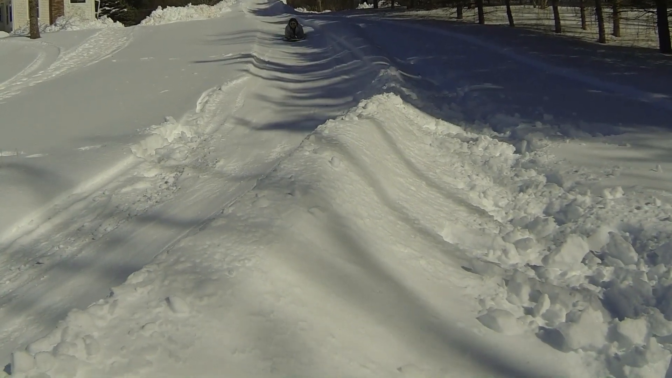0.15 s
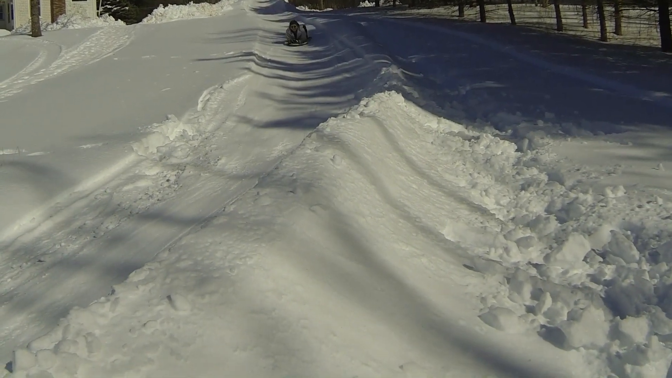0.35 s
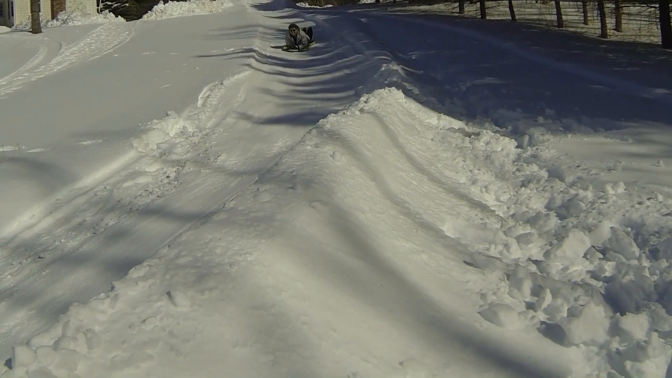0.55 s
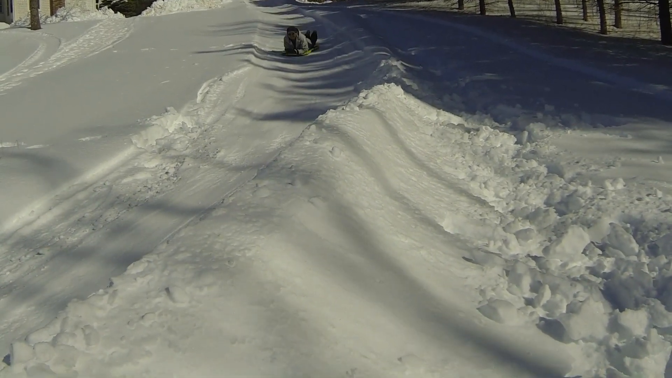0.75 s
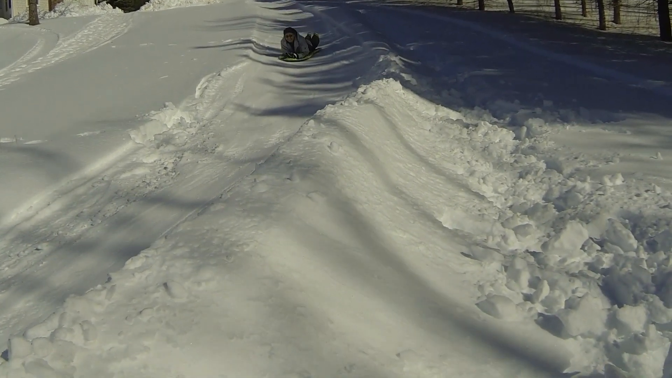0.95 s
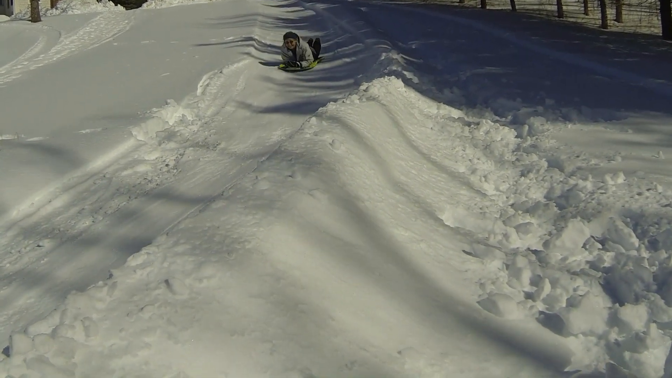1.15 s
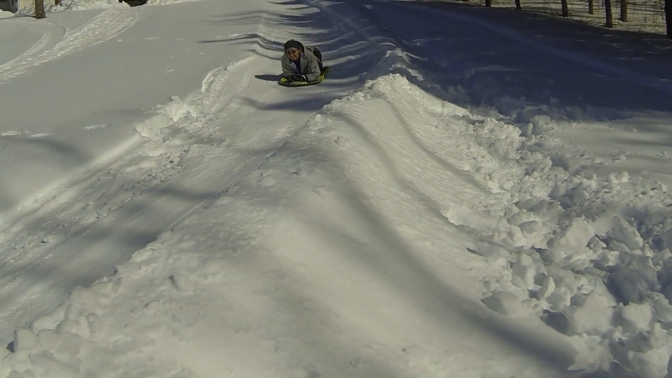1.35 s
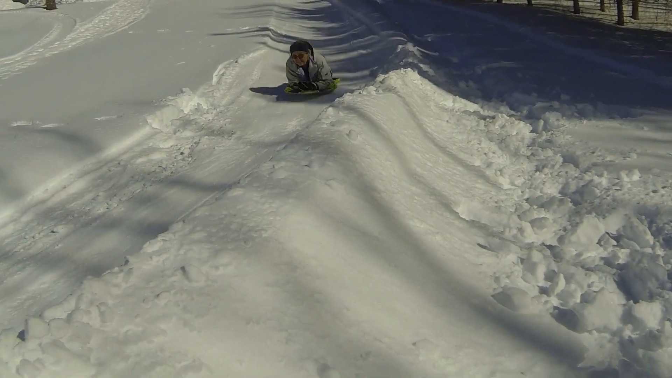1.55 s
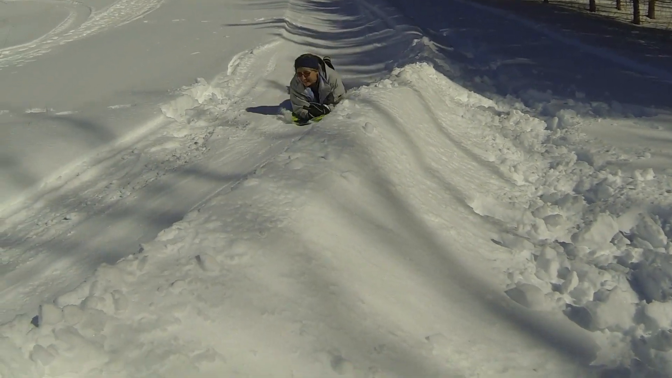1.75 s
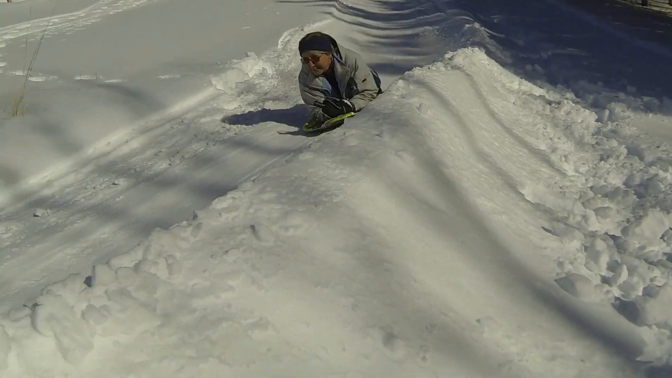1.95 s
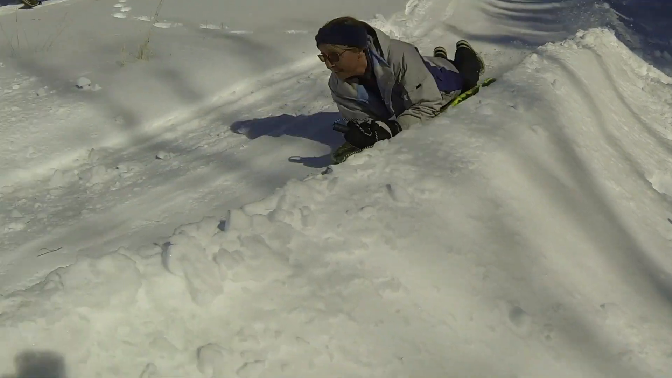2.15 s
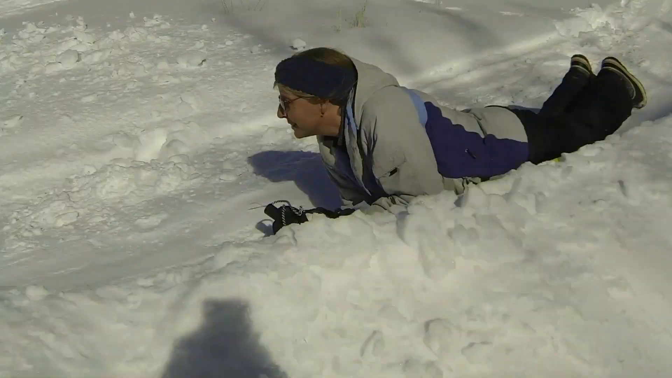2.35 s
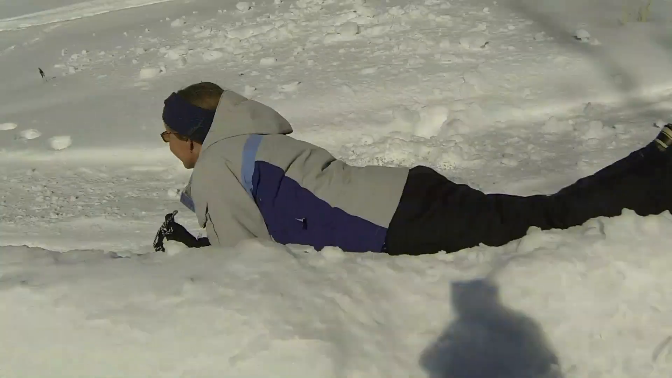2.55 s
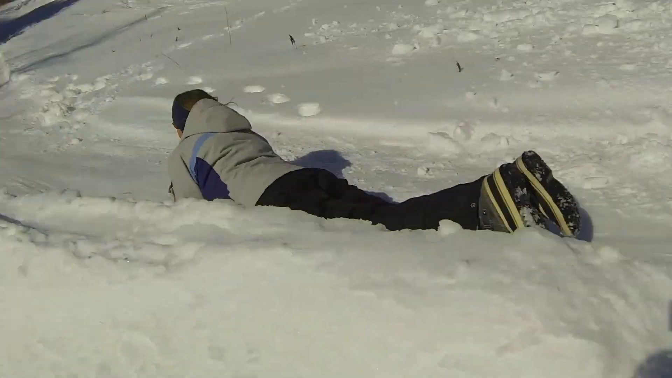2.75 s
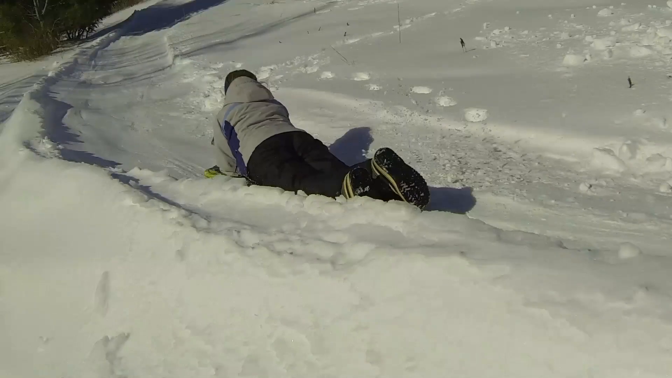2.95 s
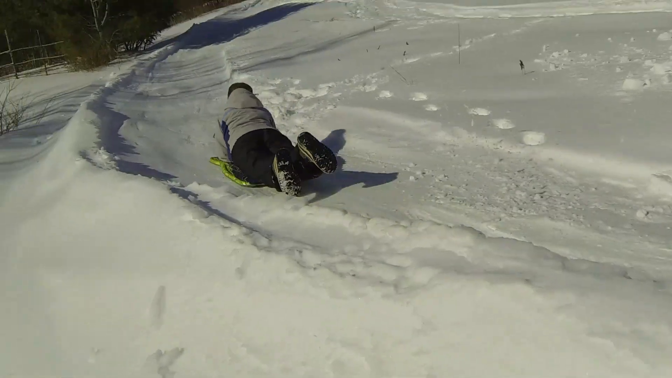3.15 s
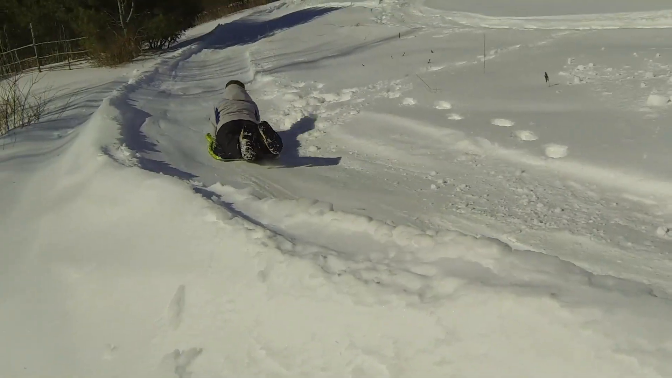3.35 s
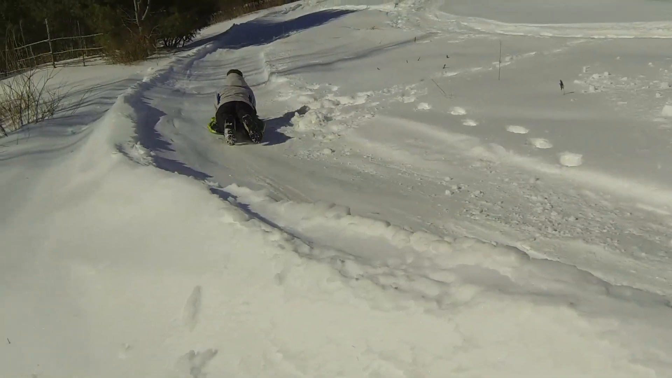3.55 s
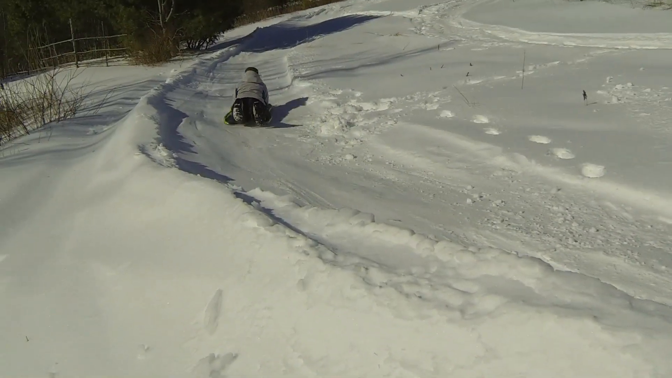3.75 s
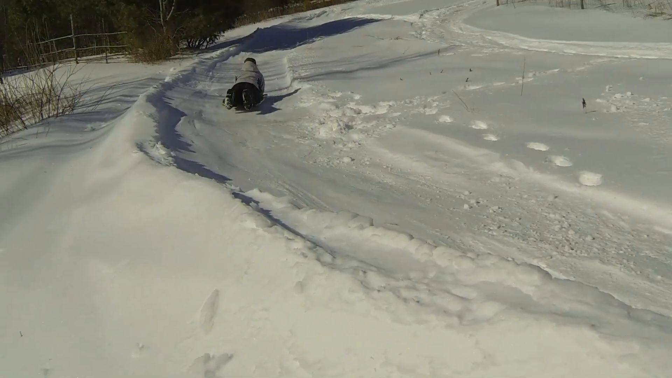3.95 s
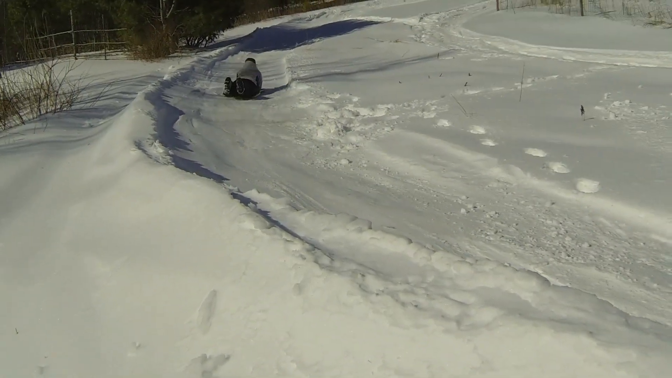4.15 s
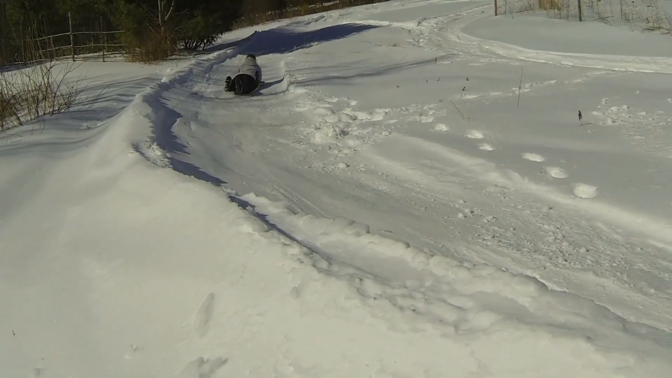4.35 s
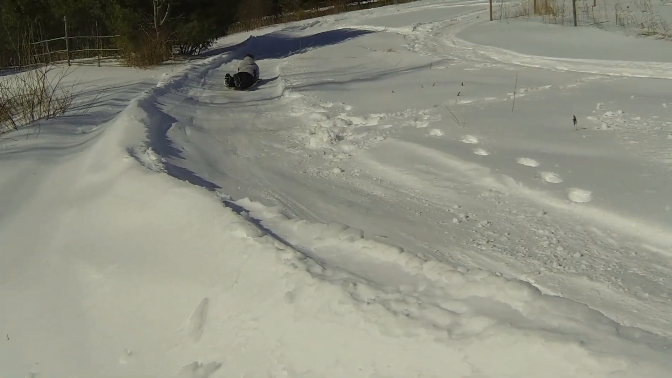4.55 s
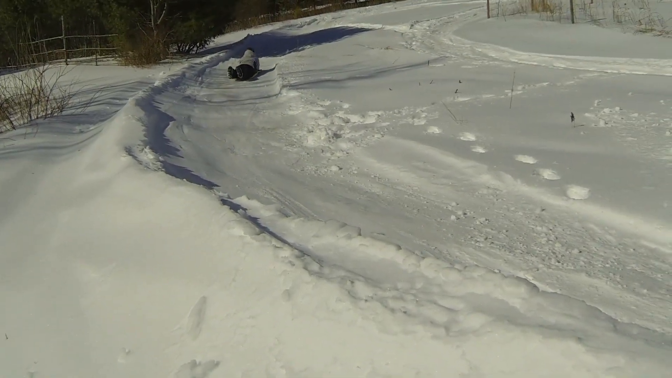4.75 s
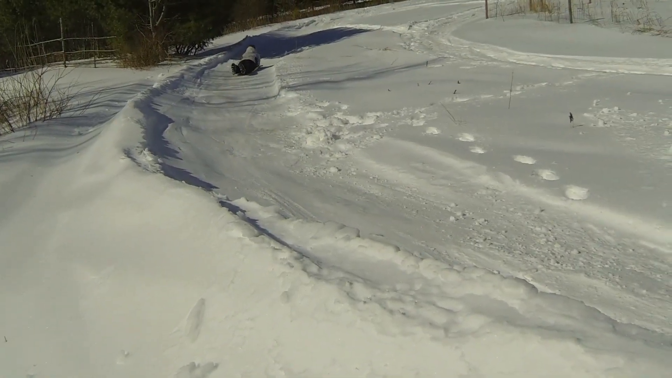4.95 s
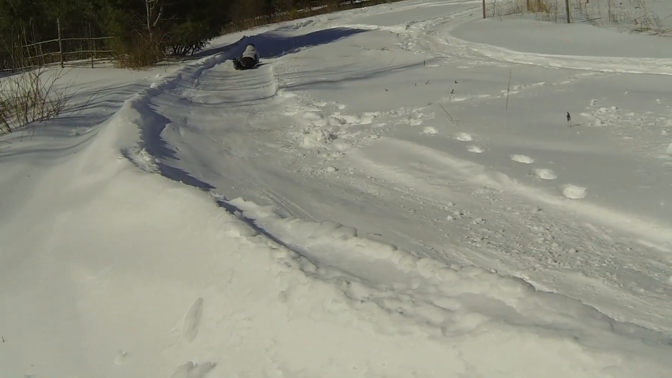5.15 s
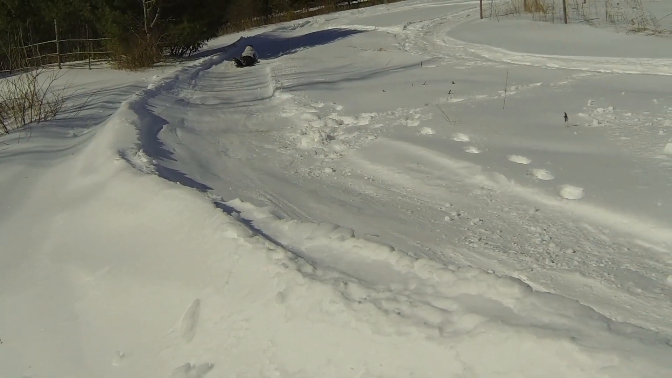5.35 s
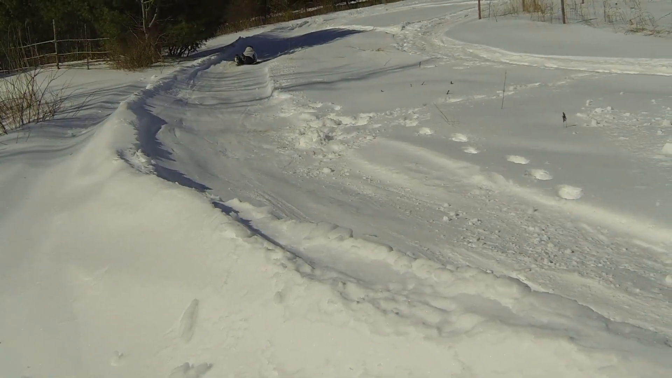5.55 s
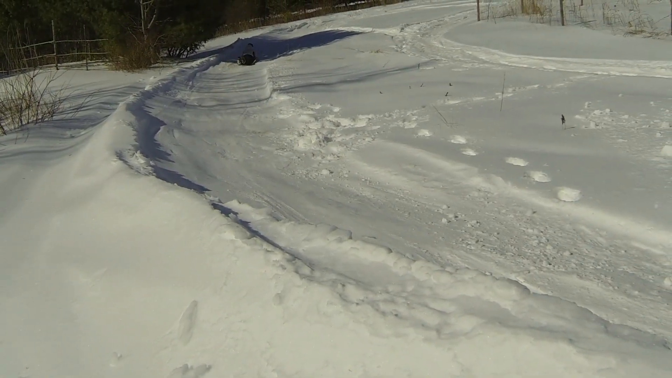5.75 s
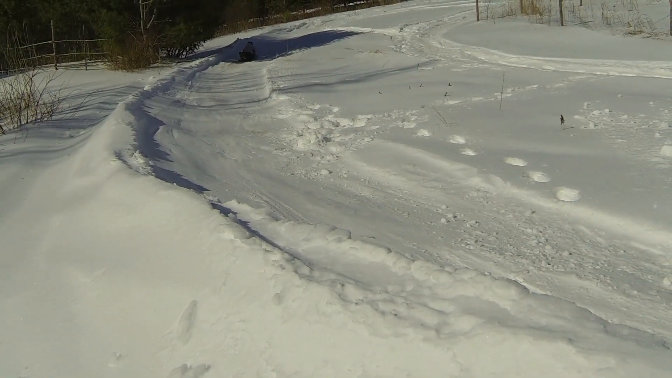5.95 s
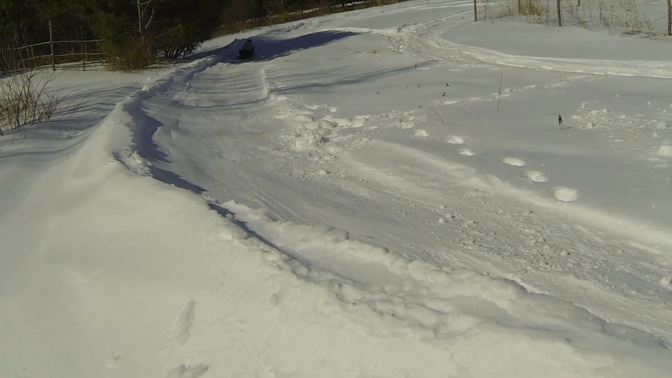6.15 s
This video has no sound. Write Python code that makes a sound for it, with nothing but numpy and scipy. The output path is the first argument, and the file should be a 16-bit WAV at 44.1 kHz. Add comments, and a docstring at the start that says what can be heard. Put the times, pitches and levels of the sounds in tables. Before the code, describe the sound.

An open snow slope, dry and echoless, heard through a small camera microphone with steady soft air and a very faint, high electronic whirr. From 0 to 1 s, low gusts and bumps of wind dominate, strongest near 0.8 s, while a distant plastic sled rumbles faintly with a fine hiss. Between 1 and 2.2 s it nears: hollow drumming swells, wind gusts again, and dull thumps, crust snaps and bright edge slices cluster around 1.75 to 2 s. The close pass peaks from 2.4 to 2.8 s, with heavy muffled knocks, crunching, cracking and spraying powder, densest near 2.65 s. From 2.8 to 4.1 s the tail scrapes grittily away, with knocks and snaps near 3.4, 3.6 and 4 s. Afterwards the slide thins and slows; light scrapes and wind bumps remain, and a faint hollow drone rises from about 4.9 s and holds to the end at 6.2 s.

```python
"""Sled passing on packed snow

A rider on a plastic sled comes down a packed run, sweeps past close by and glides away.
Hull rumble, crunch, scrape, hiss and powder are coloured grain noise; thumps are decaying sines.
Snaps are short noise bursts, edge slices swelling bright noise. Wind noise and low knocks buffet the
microphone of a small camera, whose electronics whirr faintly; steady air and a late hollow drone lie under.
"""
import sys
import numpy as np
from scipy import signal
from scipy.fft import rfft, irfft, next_fast_len
from scipy.io import wavfile

SR = 44100
rng = np.random.default_rng(int(sys.argv[2]) if len(sys.argv) > 2 else 0)


def output_pcm(signal):
    """Save a mono or channel-first signal as 16-bit PCM at the path in sys.argv[1].

    Samples are clipped to [-1, 1] before scaling.
    """
    pcm = np.clip(np.atleast_2d(signal).T, -1, 1) * 32767
    wavfile.write(sys.argv[1], SR, np.round(pcm).astype(np.int16))


N = 274037
TIME_S = np.arange(N) / SR

# Snow grip on the base, powdery patches; before trims: t/s, hiss level/dB, spray level/dB
GLIDE = [(0, -60.5, -70), (0.38, -59, -67), (0.72, -59.5, -60), (1.1, -58, -63), (1.38, -54.5, -60),
         (1.7, -66, -69.5), (1.88, -57, -63.5), (2.16, -61, -63.5), (2.36, -52, -58), (2.72, -51.5, -57.5),
         (2.92, -57.5, -60.5), (3.4, -54.5, -62.5), (3.68, -57, -67), (3.84, -53.5, -63), (4.05, -56, -67),
         (4.52, -55.5, -70.5), (5.35, -63.5, -75), (5.8, -64.5, -70), (6.21, -67.5, -72.5)]
# Breeze on the microphone, before trim: t/s, level/dB
GUSTS = [(0.0, -63), (0.03, -53.5), (0.48, -44.5), (0.62, -41.5), (0.8, -36.5), (1.12, -47.5),
         (1.38, -36.5), (2.18, -40), (2.28, -30), (2.34, -44), (2.5, -44), (2.61, -34.5), (3.16, -43),
         (4.44, -41.5), (4.55, -37), (4.58, -51), (4.74, -46), (5.71, -53), (6.16, -46.5), (6.21, -59)]
# Eddies striking the microphone: t/s, envelope peak/dB, f/Hz, t60/s
BUFFETS = [(0.150, -34.5, 88, 0.025), (0.452, -33.5, 90, 0.02), (0.799, -23, 89, 0.02),
           (1.992, -25, 65, 0.046), (2.622, -24, 74.5, 0.059), (2.775, -26, 62, 0.028),
           (3.684, -32, 99, 0.043), (3.828, -33, 135, 0.05), (4.038, -27.5, 83.6, 0.02),
           (4.099, -24.5, 79.5, 0.0098), (4.505, -33, 65, 0.045), (4.768, -35, 65, 0.047),
           (5.565, -35, 68, 0.053)]
# Hull hitting lumps, before the shell's low-pass: t/s, envelope peak/dB, f/Hz, t60/s
THUMPS = [(0.934, -27.5, 147, 0.049), (1.515, -34, 214, 0.092), (1.557, -32, 200, 0.06),
          (1.595, -32, 147, 0.069), (1.7385, -19, 302, 0.015), (1.822, -24.5, 250, 0.016),
          (1.940, -28, 256, 0.085), (1.956, -28, 298, 0.04), (1.974, -31, 386, 0.015),
          (2.008, -28, 332, 0.023), (2.028, -32, 426, 0.037), (2.239, -28, 427, 0.012),
          (2.262, -33, 235, 0.05), (2.4085, -19.5, 260, 0.063), (2.461, -26.5, 359, 0.05),
          (2.5095, -16, 228, 0.0091), (2.622, -19, 310, 0.02), (2.629, -16, 170, 0.0087),
          (2.6395, -11.5, 480, 0.0098), (2.644, -26.5, 610, 0.056), (2.657, -26, 795, 0.036),
          (2.667, -23, 324, 0.018), (2.678, -27, 576, 0.017), (2.689, -26, 286, 0.044),
          (2.7035, -24, 232, 0.026), (2.767, -17, 192, 0.025), (2.780, -20, 209, 0.04),
          (3.3135, -24, 233, 0.022), (3.4345, -23, 201, 0.016), (3.574, -23, 235, 0.012),
          (3.599, -33, 330, 0.032), (4.0155, -26.5, 310, 0.021)]
# Crust snapping, before trim: t/s, level/dB, f/Hz, bandwidth/Hz, t60/s
SNAPS = [(0.995, -41.5, 3400, 1500, 0.034), (1.594, -45, 2930, 1200, 0.03), (1.798, -35, 3060, 900, 0.03),
         (1.81, -36, 2570, 2600, 0.02), (1.899, -39, 2960, 950, 0.035), (1.939, -35.5, 2300, 1700, 0.047),
         (2.013, -45, 2200, 1900, 0.03), (2.090, -41.5, 3600, 1400, 0.014), (2.316, -35, 1500, 1000, 0.026),
         (2.480, -31, 3070, 800, 0.035), (2.577, -32.5, 1700, 950, 0.025), (2.624, -32, 2960, 2400, 0.04),
         (2.766, -34, 1900, 1800, 0.012), (2.781, -37.5, 3800, 3000, 0.032),
         (2.929, -30.5, 1510, 650, 0.015), (3.069, -38, 2850, 450, 0.06),
         (3.413, -29.5, 1490, 1400, 0.0074), (3.465, -32.5, 1500, 800, 0.01),
         (3.569, -36, 2380, 1800, 0.016), (3.823, -35, 2800, 900, 0.008), (3.982, -29, 755, 400, 0.022),
         (4.309, -40.5, 3620, 400, 0.027)]
# Hull edge slicing off snow, before trim: t/s, length/s, level/dB, peak f/Hz, peak-to-shower ratio/1
SLICES = [(1.283, 0.25, -65.5, 10500, 1.2), (1.736, 0.019, -61, 3300, 1.7),
          (1.739, 0.116, -52.5, 3470, 0.55), (1.795, 0.074, -64, 10000, 1.0),
          (2.21, 0.16, -62.5, 10000, 0.64), (2.456, 0.053, -59, 6000, 0.8), (2.56, 0.12, -54.5, 6000, 1.0),
          (2.752, 0.031, -58, 5700, 1.1), (2.772, 0.085, -50.5, 3400, 3.3), (3.02, 0.16, -62, 3050, 5),
          (2.93, 0.22, -68, 10000, 0.61), (3.143, 0.046, -60, 6000, 0.45), (3.56, 0.054, -59, 5800, 0.89),
          (3.9, 0.05, -66, 6000, 0.5)]
# Rises press the hull down, dips unload it: middle t/s, length/s, rumble gain/dB, friction gain/dB
RISES = [(0.24, 0.25, 5, -2), (0.9, 0.36, 4, 1.5), (1.31, 0.24, 6, 1), (1.54, 0.34, 2, 3),
         (1.67, 0.068, 3.5, 2), (1.745, 0.056, 5.5, 7.5), (1.82, 0.076, 5.5, 7), (1.98, 0.17, 7, 1.5),
         (2.02, 0.028, -0.5, 4), (2.15, 0.08, -1.5, 1), (2.24, 0.071, 4.5, 3), (2.48, 0.16, 1.5, 3.5),
         (2.36, 0.1, -1, 0), (2.54, 0.1, -1.5, -4.5), (2.605, 0.093, 3.5, 3), (2.67, 0.096, 3.5, 3),
         (2.735, 0.069, -4, -2.5), (2.79, 0.18, 4, 1), (2.9, 0.29, -3.5, -1), (3.07, 0.26, -2, 2.5),
         (3.235, 0.17, -5, -0.5), (3.39, 0.2, -3, -1), (3.48, 0.078, 3.5, 3), (3.59, 0.12, 2.5, 0.5),
         (3.66, 0.061, 1.5, -1.5), (3.9, 0.13, 3, 1.8), (3.99, 0.096, -2.5, -1), (4.32, 0.25, -1.5, 0),
         (4.64, 0.11, 0, -1.5), (5.02, 0.062, 0.5, -3.5), (5.2, 0.36, -3.5, 1)]
# Rear edge digging in: middle t/s, length/s, scrape gain/dB
DRAGS = [(2.88, 0.44, 10.5), (3.04, 0.07, 3), (3.475, 0.06, 4), (3.6, 0.22, 7), (3.905, 0.12, 5.5),
         (4.835, 0.06, 3), (4.97, 0.092, 4.5), (5.99, 0.3, 6.5)]

# Relative spectra of hull, crust, rear edge, base, powder, thrown snow: f/Hz, level/dB per Hz
RUMBLE_COLOUR = [(50, -30), (125, -4), (170, -1.5), (270, 3.5), (450, 1.5), (600, -2), (740, -6),
                 (860, -13.5), (960, -20.5), (1200, -27), (2500, -45)]
CRUNCH_COLOUR = [(500, 6), (900, 7), (1150, 1), (1350, -2), (1600, 3.5), (2050, -3.5), (2600, -9),
                 (4000, -35)]
GRIT_COLOUR = [(300, -7), (550, 3.5), (850, -1), (1100, -4.5), (1400, -9.5), (2000, -17)]
HISS_COLOUR = [(1200, -40), (2000, -10), (2500, -2.5), (3000, 2), (3500, -4), (4000, -9), (4800, -21.5),
               (7000, -40.5)]
SPRAY_COLOUR = [(3000, -1), (4200, -2.5), (4900, -4), (5600, 3), (6200, 0), (7000, -5), (8200, -9),
                (9300, -11.5), (10500, -12.5), (12000, -19), (13500, -28), (15200, -39)]
SHOWER_COLOUR = [(2500, 1), (3500, 3.5), (4800, -1.5), (6000, -0.5), (8000, -7.5), (11000, -13.5),
                 (13000, -19), (15000, -28)]
# Relative spectra of wind, steady air, electronics, far drone: f/Hz, level/dB per Hz
WIND_COLOUR = [(10, -29), (25, 6), (36, 2), (60, 0), (100, -3.5), (150, -8.5), (210, -15), (500, -27.5)]
AIR_COLOUR = [(30, 8.5), (130, -1), (210, -2.5), (340, -9), (700, -12.5), (1300, -15), (3000, -28.5),
              (5000, -32.5), (8000, -31), (15000, -50)]
WHIRR_COLOUR = [(6000, -42), (7600, -7), (8300, -5), (9000, -13), (11000, -32)]
DRONE_COLOUR = [(140, -22), (180, 1), (215, 2), (265, -1.5), (330, -25)]

PASS_S, SPEED_M_PER_S, CLOSEST_M = 2.563, 5.73, 3.02
RUMBLE_DB = -36  # at the closest point, before load, aspect and judder
RUNOUT_S, RUNOUT_LENGTH_S, RUNOUT_LOSS_DB = 4.73, 0.6, 5.5  # hull quietens as the sled slows on the level
SHELL_CUTOFF_HZ = 890  # padded shell dulls knocks above this
AIR_DB, WHIRR_DB = -53.5, -79
FRAME_HZ, FRAME_START_S = 29.97, 0.0268
CUTOFF_HZ = 15300


def from_db(db):
    """Decibels to amplitude gain."""
    return 10 ** (np.asarray(db) / 20)


def rms_one(x):
    """Scale to unit rms."""
    return x / np.sqrt(np.mean(x ** 2) + 1e-20)


def in_time(rows):
    """Interpolate each column of a time table to every sample."""
    t_s, *columns = np.transpose(rows)
    return [np.interp(TIME_S, t_s, column) for column in columns]


def coloured(x, spectrum):
    """Shape x by a spectrum falling 12 dB per octave past both ends; rms 1."""
    hz, db = np.transpose(spectrum)
    size = next_fast_len(N)
    f_hz = np.maximum(np.fft.rfftfreq(size, 1 / SR), 1)
    ends = np.minimum(f_hz / hz[0], 1) ** 2 * np.minimum(hz[-1] / f_hz, 1) ** 2
    gain = from_db(np.interp(np.log(f_hz), np.log(hz), db))
    return rms_one(irfft(rfft(x, size) * ends * gain, size)[:N])


def drift(rate_hz):
    """Smooth random curve, rms 1: noise whose amplitude spectrum is halved at rate_hz."""
    size = next_fast_len(N)
    f_hz = np.fft.rfftfreq(size, 1 / SR)
    smooth = rfft(rng.standard_normal(N), size) / (1 + (f_hz / rate_hz) ** 2)
    return rms_one(irfft(smooth, size)[:N])


def grains(per_s, spread_db, share):
    """Snow grains giving way: uneven clicks, share of the power, in smooth friction noise."""
    size_db = spread_db * np.minimum(rng.exponential(1, N), 4)
    sizes = from_db(size_db) * rng.choice([-1, 1], N)
    clicks = rms_one(sizes * (rng.random(N) < per_s / SR))
    return np.sqrt(share) * clicks + np.sqrt(1 - share) * rng.standard_normal(N)


def blow(start_s, t60_s, rise_s):
    """Time since a contact, and its swelling and dying envelope of height 1."""
    age_s = np.clip(TIME_S - start_s, 0, 1)
    shape = (1 - np.exp(-age_s / rise_s)) ** 2 * from_db(-60 * age_s / t60_s)
    return age_s, shape / shape.max()


def knocks(table, rise_s):
    """Each blow swings as a decaying sine."""
    out = np.zeros(N)
    for start_s, peak_db, hz, t60_s in table:
        age_s, shape = blow(start_s, t60_s, rise_s)
        out += from_db(peak_db) * shape * np.sin(2 * np.pi * hz * age_s)
    return out


def swells(rows):
    """Sum each gain column, in dB, as half-cosine humps."""
    humps = [np.cos(np.pi * np.clip((TIME_S - middle_s) / length_s, -.5, .5))
             for middle_s, length_s, *_ in rows]
    return np.array(rows)[:, 2:].T @ np.array(humps)


def path():
    """Straight pass: distance loss in dB, and the side shown (-1 nose, +1 tail)."""
    along_m = SPEED_M_PER_S * (TIME_S - PASS_S)
    distance_m = np.hypot(along_m, CLOSEST_M)
    return 20 * np.log10(CLOSEST_M / distance_m), along_m / distance_m


def hull(track, load_db, facing, aft_db=2.0, judder_db=-0.2):
    """Small lumps drum on the plastic shell, which the rider's weight damps."""
    slowing = np.clip((TIME_S - RUNOUT_S) / RUNOUT_LENGTH_S, 0, 1)
    drumming = coloured(grains(per_s=260, spread_db=1.5, share=0.44), RUMBLE_COLOUR)
    level_db = RUMBLE_DB + load_db + aft_db * facing - RUNOUT_LOSS_DB * slowing
    return from_db(level_db + judder_db * track) * drumming


def crunch(track, friction_db, drag_db, facing,
           level_db=-0.5, aft_db=3.5, near_db=1.5, judder_db=0.6, drag_share=0.17):
    """Coarse crust grains break under the hull, favoured from alongside and behind."""
    breaking = coloured(grains(per_s=600, spread_db=-0.5, share=0.63), CRUNCH_COLOUR)
    aspect_db = aft_db * facing + near_db * (1 - facing ** 2)
    gain_db = friction_db + level_db + aspect_db + drag_share * drag_db + judder_db * track
    return from_db(gain_db) * breaking


def tail_scrape(track, friction_db, drag_db, facing, level_db=-4.5, aft_db=9.0, judder_db=0.2):
    """The rear edge drags over packed track; the rider's body screens it on the approach."""
    grit = coloured(grains(per_s=600, spread_db=5.0, share=0.39), GRIT_COLOUR)
    gain_db = friction_db + level_db + aft_db * facing + drag_db + judder_db * track
    return from_db(gain_db) * grit


def sliding(track, hiss_db, spray_db,
            base_db=-2.53, powder_db=0.57, judder_db=0.73, powder_judder_db=0.8):
    """Fine crystals rub along the base and fly off as powder; the same grains drive both."""
    rubbing = grains(per_s=2500, spread_db=2.5, share=0.38)
    hiss_gain = from_db(hiss_db + base_db + judder_db * track)
    spray_gain = from_db(spray_db + powder_db + powder_judder_db * track)
    return hiss_gain * coloured(rubbing, HISS_COLOUR) + spray_gain * coloured(rubbing, SPRAY_COLOUR)


def wind(level_db=0.6, lumpy_db=1):
    """Eddies buffet the microphone port: gusting low noise and single low knocks."""
    gust_db, = in_time(GUSTS)
    eddies = rng.standard_normal(N) * from_db(lumpy_db * drift(rate_hz=11.0))
    rush = from_db(gust_db + level_db) * coloured(eddies, WIND_COLOUR)
    return rush + knocks(BUFFETS, rise_s=0.0025)


def background_air():
    """Steady noise, weighted to the lows."""
    return from_db(AIR_DB) * coloured(rng.standard_normal(N), AIR_COLOUR)


def camera_whirr(sharpness=1.8, uneven=0.35):
    """The electronics fizz twice a frame, once strongly and once weakly."""
    turn = 2 * np.pi * FRAME_HZ * (TIME_S - FRAME_START_S)
    gate = np.exp(sharpness * np.cos(2 * turn)) * (1 + uneven * np.cos(turn))
    return from_db(WHIRR_DB) * rms_one(gate) * coloured(rng.standard_normal(N), WHIRR_COLOUR)


def thumps():
    """Big lumps flex the padded shell in dull knocks."""
    dull = signal.butter(2, SHELL_CUTOFF_HZ, fs=SR, output="sos")
    return signal.sosfilt(dull, knocks(THUMPS, rise_s=0.00062))


def snaps(level_db=-9.0, rise_s=0.00035):
    """A piece of crust cracks in a short noise burst around its own pitch."""
    out = np.zeros(N)
    for start_s, snap_db, hz, width_hz, t60_s in SNAPS:
        edges_hz = [max(hz - width_hz / 2, 20), hz + width_hz / 2]
        band = signal.butter(2, edges_hz, "band", fs=SR, output="sos")
        _, shape = blow(start_s, t60_s, rise_s)
        burst = shape * signal.sosfilt(band, rng.standard_normal(N))
        shape_rms = np.sqrt(np.mean(shape ** 2))
        out += from_db(snap_db + level_db) * shape_rms * rms_one(burst)
    return out


def slices(track, level_db=1, judder_db=1.9, q=2.7, settle_s=0.012):
    """The edge digs in and lets go, throwing bright crystals; a hard bite rasps at one pitch."""
    shower = coloured(grains(per_s=3100, spread_db=0.5, share=0.4), SHOWER_COLOUR)
    fall = np.exp(-1 / (settle_s * SR))
    out = np.zeros(N)
    for start_s, length_s, slice_db, hz, bite in SLICES:
        phase = np.clip((TIME_S - start_s) / length_s, 0, 1)
        depth = np.sqrt(4 * phase * (1 - phase))
        # thrown snow settles a moment later; the offset avoids denormals
        settling = signal.lfilter([1 - fall], [1, -fall], depth + 1e-18)
        depth = np.maximum(depth, settling)
        rasp = rms_one(signal.lfilter(*signal.iirpeak(hz, q, fs=SR), shower))
        out += from_db(slice_db + level_db) * depth * rms_one(shower + bite * rasp)
    return from_db(judder_db * track) * out


def far_drone(level_db=-55.0, start_s=4.9, swell_s=0.5):
    """On the run-out a faint, hollow noise band comes up under the fading slide and holds."""
    swell = np.clip((TIME_S - start_s) / swell_s, 0, 1)
    return from_db(level_db) * swell * coloured(rng.standard_normal(N), DRONE_COLOUR)


def scene(uneven_db=0.99):
    """The sled on an open slope, where snow swallows all echoes."""
    track = drift(rate_hz=58)  # track ripples shake the sled's continuous sounds and slices together
    distance_db, facing = path()
    load_db, bite_db = swells(RISES) + uneven_db * drift(rate_hz=5.2)
    drag_db, = swells(DRAGS)
    grip_db, powder_db = in_time(GLIDE)
    friction_db = grip_db + bite_db

    body = hull(track, distance_db + load_db, facing) + thumps()
    coarse = crunch(track, friction_db, drag_db, facing)
    coarse += tail_scrape(track, friction_db, drag_db, facing) + snaps()
    fine = sliding(track, friction_db, powder_db + bite_db) + slices(track)
    surroundings = wind() + far_drone() + background_air() + camera_whirr()
    return (body + coarse + fine + surroundings)[None]


def record(dry):
    """An elliptic low-pass cuts the top steeply."""
    top_cut = signal.ellip(10, .1, 80, CUTOFF_HZ, fs=SR, output="sos")
    return signal.sosfilt(top_cut, dry)


dry = scene()
out = record(dry)
output_pcm(out)
```